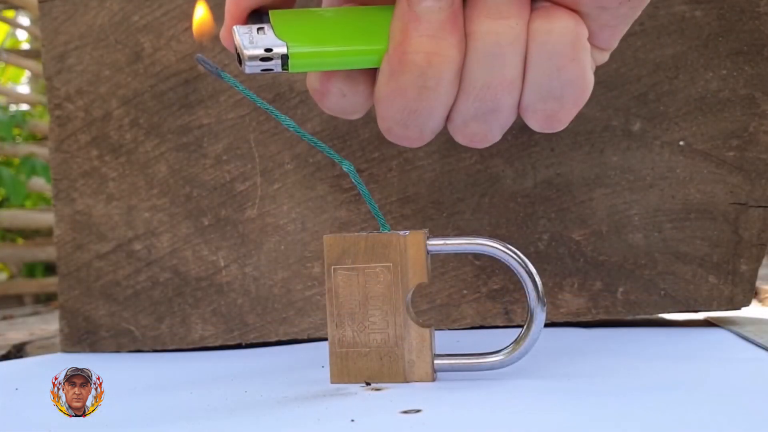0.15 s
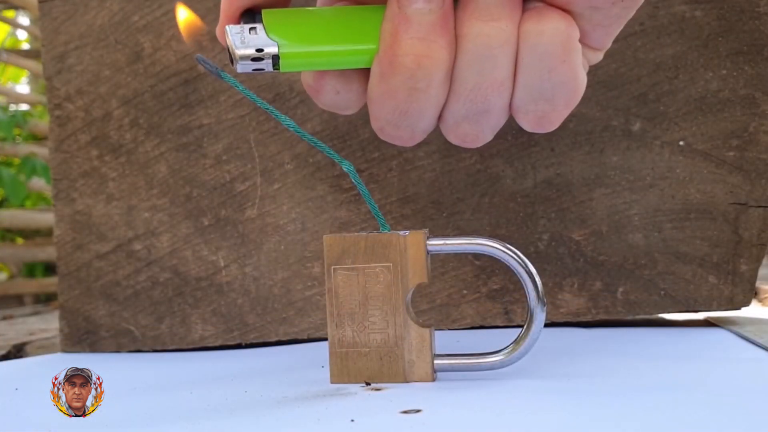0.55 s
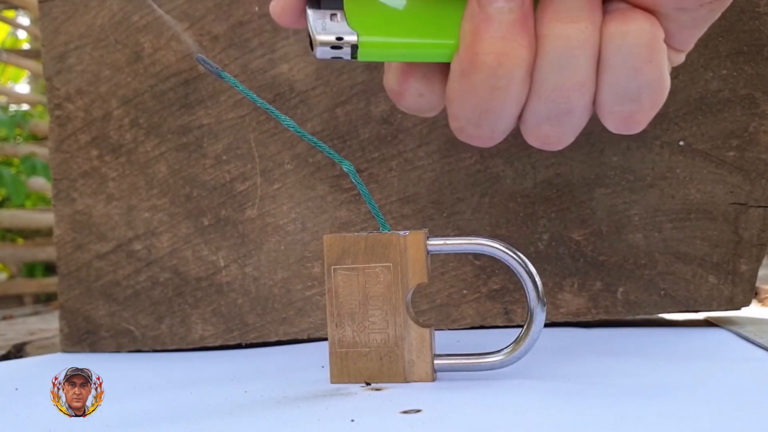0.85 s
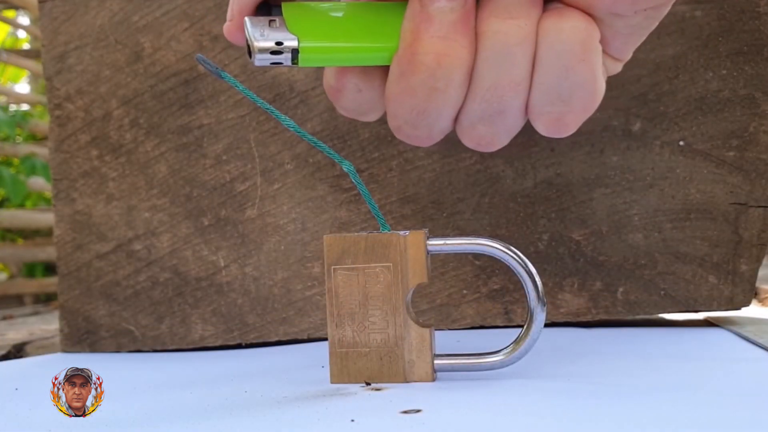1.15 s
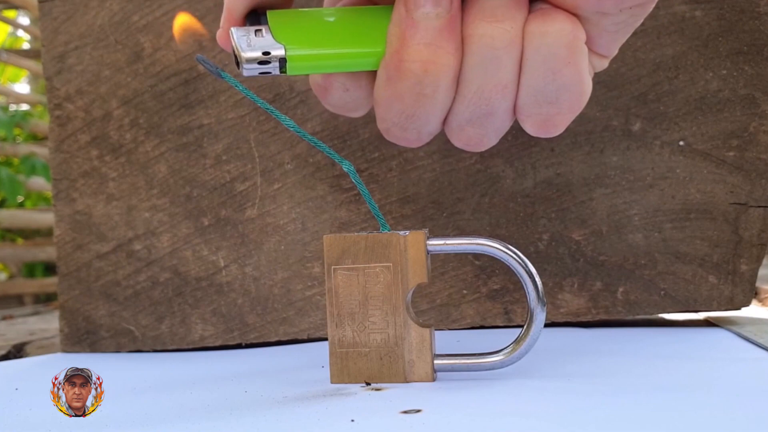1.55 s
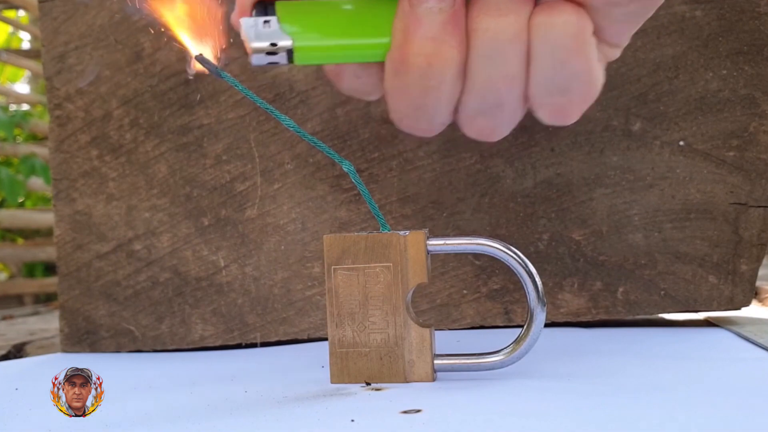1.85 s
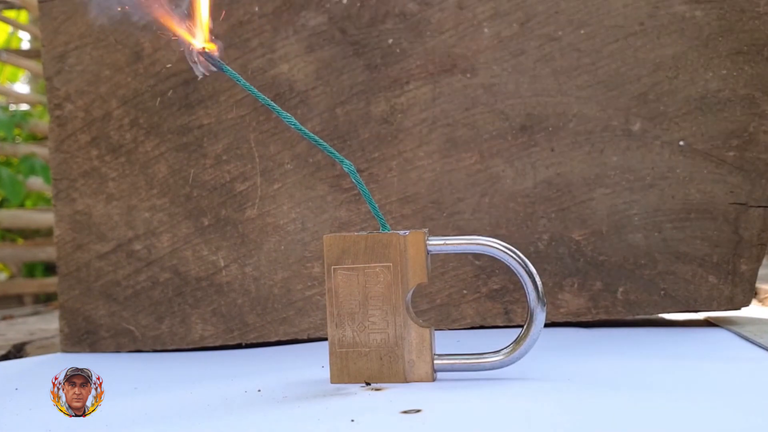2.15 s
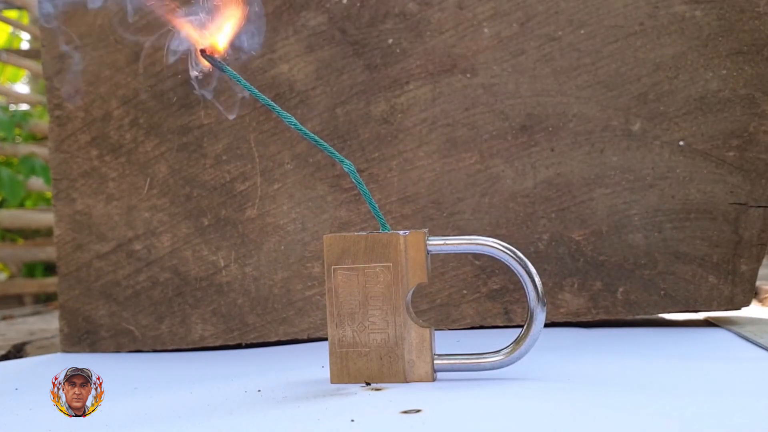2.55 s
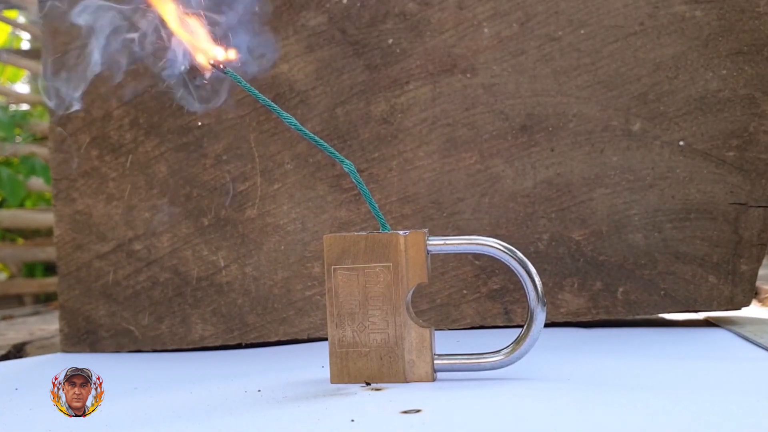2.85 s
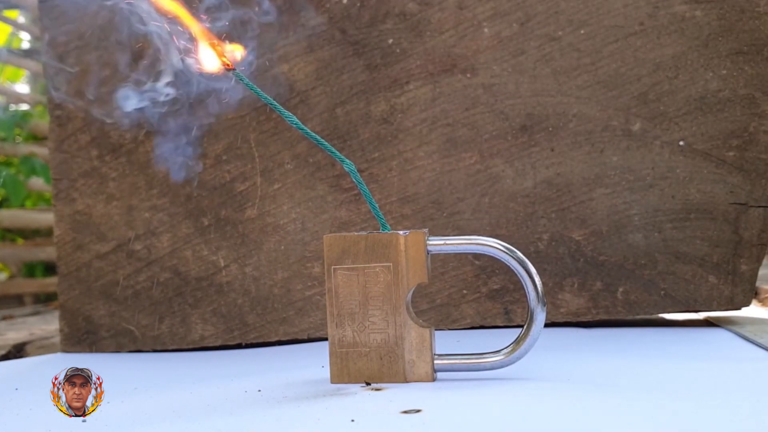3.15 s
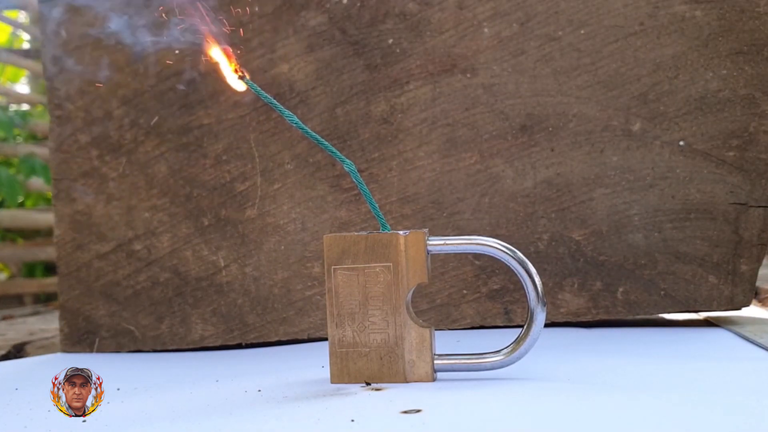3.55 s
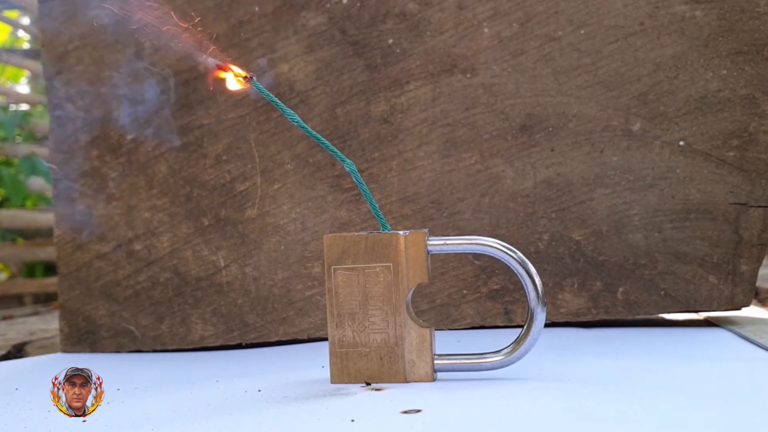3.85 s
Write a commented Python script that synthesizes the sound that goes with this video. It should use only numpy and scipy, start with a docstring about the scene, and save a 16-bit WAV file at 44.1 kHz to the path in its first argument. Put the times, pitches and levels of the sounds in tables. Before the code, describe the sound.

A burning fuse hisses and crackles, catching after two sharp lighter snaps and just before a third. It spits and pops most near the end, heard up close in a dry room with a faint, distant motor hum.

```python
"""A fairly dead room, a motor droning far away; close to the microphone, in front of a wooden board,
a piezo lighter snaps off, is struck again and lights a thin fuse. The lighter snaps off once more.
The fuse burns on with a bright hiss of gas over a fluttering flame and the fine crackle of powder grains,
with a few pops and spells of spitting, thickest near the end. The room adds a short tail."""
import sys
import numpy as np
from scipy import signal
from scipy.fft import rfft, irfft
from scipy.io import wavfile
from scipy.ndimage import uniform_filter1d

SR = 44100
rng = np.random.default_rng(int(sys.argv[2]) if len(sys.argv) > 2 else 0)


def digitize_waveform(pressure):
    """Quantize a signal to 16-bit integers and store it at the path in sys.argv[1].

    Rows of a 2-D input are taken as channels; values are limited to [-1, 1].
    """
    field = np.atleast_2d(pressure).T
    bounded = np.clip(field, -1, 1)
    quanta = np.round(bounded * 32767).astype(np.int16)
    wavfile.write(sys.argv[1], SR, quanta)


N = 176400

# resonances of the lighter's plastic case: pitch_hz, width_hz, level_db
PLASTIC_CASE_MODES = [(2312, 624, 2.5), (3930, 430, -7), (5660, 1000, -4.5)]
# resonances of its metal cap: pitch_hz, width_hz, level_db
METAL_CAP_MODES = [(3960, 1730, -11), (5320, 2000, -6.5), (6650, 2100, 0), (9250, 550, -3),
                   (10470, 4700, 2), (12200, 1300, -13), (14100, 1880, -8)]
CLICK_DECAY_S = .0007


def undb(db):
    """Decibels to gain."""
    return 10 ** (np.asarray(db) / 20)


def unit(x):
    """Scale to rms 1."""
    return x / np.sqrt(np.mean(x ** 2))


def clock():
    """Time of every sample in seconds."""
    return np.arange(N) / SR


def over_time(points):
    """Join (time_s, value) points into one value per sample."""
    return np.interp(clock(), *np.array(points).T)


def swell(start, length):
    """A smooth rise and fall."""
    return np.sin(np.pi * np.clip((clock() - start) / length, 0, 1))


def per_bin(points):
    """Join (frequency_hz, value) points on a log-frequency axis, one value per FFT bin."""
    hz, value = np.array(points, float).T
    return np.interp(np.log(np.arange(N // 2 + 1) * SR / N + 1), np.log(hz), value)


def colour(x, points):
    """Filter by a spectrum that falls away outside its ends, then scale to rms 1."""
    skirted = [(points[0][0] / 2, -80)] + list(points) + [(points[-1][0] * 2, -80)]
    return unit(irfft(rfft(x) * undb(per_bin(skirted)), N))


def pan(db):
    """Left and right gains for a level difference, left minus right."""
    return undb(np.array([[.5], [-.5]]) * db)


def stereo_noise(correlation):
    """Left and right noise with the given correlation, overall or per bin."""
    mid, side = rfft(rng.standard_normal((2, N)))
    alike = np.clip(correlation, -1, 1)
    return unit(irfft(mid * np.sqrt(1 + alike) + np.array([[1], [-1]]) * side * np.sqrt(1 - alike), N))


def wander(rate_hz):
    """Random drift with rms 1, mostly slower than rate_hz."""
    hz = np.arange(N // 2 + 1) * SR / N
    return unit(irfft(rfft(rng.standard_normal(N)) / (1 + (hz / rate_hz) ** 2), N))


def grains(per_s, spread_db):
    """Tiny bursts at random moments, most weak and a few strong."""
    bursts = rng.random(N) < per_s / SR
    return unit(bursts * undb(spread_db * np.minimum(rng.exponential(size=N), 5)))


def ring(x, modes):
    """Pass a push through damped modes with steep skirts."""
    out = 0
    for hz, width, db in modes:
        b, a = signal.iirpeak(hz, hz / width, fs=SR)
        out = out + undb(db) * signal.lfilter(b, a, signal.lfilter(b, a, x))
    return out


def tail(x, decay_s):
    """Diffuse reflections that die away, different on the left and right."""
    t = clock()[:SR // 2]
    echo = rng.standard_normal((2, len(t))) * np.exp(-t / decay_s)
    return signal.fftconvolve(x, echo / np.sqrt(np.sum(echo ** 2) / 2), axes=1)[:, :N]


def reverb(x, t60_s):
    """A room tail that falls 60 dB in t60_s."""
    return tail(x, t60_s / np.log(1000))


def distant_motor():
    """A far motor hums over low rumble; its tones waver with its speed and each flickers in level."""
    # tones of the motor: pitch_hz, level_db
    tones = [(80.5, -55.5), (101, -58.5), (126, -56.5), (151.5, -73), (202, -67.5), (227, -76), (252, -75)]
    # spectrum of the rumble: frequency_hz, relative_db
    rumble_colour = [(22, -25), (31, -23), (39, 3), (60, 6.5), (80, 5), (140, 5.5), (180, -8.5),
                     (280, -10.5), (450, -19.5), (800, -26), (1500, -39.5), (4000, -46.5)]
    # slow rise and fall of hum and rumble: time_s, gain_db
    drone_gain = [(0, -5.5), (.3, -3), (1.05, 0), (1.55, 3.5), (2.05, 1.5), (2.6, 0), (3.1, 0.5), (4, 0)]
    waver, flicker_db = .0077, 3
    speed = 1 + waver * wander(rate_hz=2.51)
    hum = 0
    for hz, db in tones:
        amplitude = np.sqrt(2) * undb(db + flicker_db * wander(rate_hz=15))
        hum += amplitude * np.sin(2 * np.pi * (hz * np.cumsum(speed) / SR + rng.random()))
    correlation = per_bin([(100, .9), (400, .78), (1500, .1)])
    rumble = undb(-51.5) * colour(stereo_noise(correlation), rumble_colour)
    return (hum + rumble) * undb(over_time(drone_gain)) * pan(2.5)


def room_air():
    """Faint, wide air noise that swells over the first second or so."""
    # spectrum of the air: frequency_hz, relative_db
    air_colour = [(500, 19.5), (1700, 11.5), (3300, 6), (6000, 6), (7700, -3), (9400, 10), (11200, 7.5),
                  (12200, 1), (14000, 2), (15600, -3)]
    # its rise: time_s, gain_db
    air_gain = [(0, 1), (.92, 5.5), (1.1, 9.5)]
    return undb(-82 + over_time(air_gain)) * colour(stereo_noise(.1), air_colour) * pan(3)


def handling():
    """The trigger ticks under the thumb and rings case and cap; fingers rub and the nozzle puffs gas."""
    # ticks of the trigger: start_s, level_db
    ticks = [(0.556, -56), (1.045, -57.5), (1.06, -49), (1.081, -50.5), (1.0937, -58)]
    # rubs and puffs: start_s, length_s, level_db, centre_hz, width_hz
    rustles = [(.71, .04, -77, 2200, 1400), (.94, .07, -77, 2400, 1200), (1.04, .075, -76, 2600, 1400),
               (1.245, .13, -73, 4000, 1100), (1.47, .16, -77, 1750, 300)]
    out, t = np.zeros((2, N)), clock()
    for start, length, db, hz, width in rustles:
        out += undb(db) * swell(start, length) * unit(ring(stereo_noise(.4), [(hz, width, 0)]))
    touch = sum(undb(db) * (t >= start) * np.exp(-np.minimum(abs(t - start) / CLICK_DECAY_S, 100))
                for start, db in ticks)
    return out + ring(touch * rng.standard_normal((2, N)), PLASTIC_CASE_MODES + METAL_CAP_MODES)


def lighter_snaps():
    """Each snap is a hard blow on the case and a brief chatter that rings the cap; board and room answer."""
    # snaps of the lighter: start_s, level_db, chatter_s, case_db, cap_db, left_minus_right_db
    snaps = [(0.5723, -23, 0.00083, -14.5, 1.5, 3), (1.0242, -46, 0.00049, -20, 3, 0),
             (1.1285, -18.5, 0.00066, -1, 1.5, 3.5), (1.8934, -17.5, 0.0029, -7.5, -1.5, 2.5)]
    # spectrum of the room's answer: frequency_hz, relative_db
    room_colour = [(600, -5.5), (1500, -3.5), (2600, 2.5), (4000, -2.5), (6000, -2), (8000, -8), (10000, 0),
                   (12500, -4.5), (15500, -3.5)]
    rattle_db, rattle_decay_s = -16.5, .004
    board_db, board_delay_s = -26.5, .0024
    direct, room_pushes, t = np.zeros((2, N)), np.zeros((2, N)), clock()[:SR // 20]
    blow = undb(25) * (t == 0)
    knock = ring(blow, [(1129, 660, -20.5)])
    rattle = undb(rattle_db) * np.exp(-t / rattle_decay_s)
    for start, db, chatter_s, case_db, cap_db, pan_db in snaps:
        envelope = np.exp(-np.maximum(t - chatter_s, 0) / CLICK_DECAY_S) + rattle
        chatter = np.sign(rng.standard_normal((2, len(t)))) * envelope
        case = undb(case_db) * ring(blow + undb(-8) * chatter[0], PLASTIC_CASE_MODES)
        cap = undb(cap_db) * ring(chatter, METAL_CAP_MODES)
        i = int(start * SR)
        direct[:, i:i + len(t)] += 2 * undb(db) * pan(pan_db) * (knock + case + cap)
        room_pushes[:, i] += undb(db) * np.sqrt(np.sum(envelope ** 2))
    board_echo = undb(board_db) * np.roll(direct, int(board_delay_s * SR), axis=1)
    room = undb(-21) * np.std(direct) * colour(reverb(room_pushes, t60_s=.34), room_colour)
    return direct + board_echo + room


def shimmer(x, depth_db=2, span_hz=400, span_s=.09):
    """Let neighbouring bands swell and sink on their own, as a restless jet does."""
    size = 512
    bands = signal.stft(x, nperseg=size)[2]
    drift = rng.standard_normal(bands.shape[1:])
    drift = uniform_filter1d(drift, round(span_hz * size / SR), axis=0)
    drift = uniform_filter1d(drift, round(span_s * SR * 2 / size), axis=1)
    return unit(signal.istft(bands * undb(depth_db * unit(drift)), nperseg=size)[1][:, :N])


def burning_fuse():
    """Gas and bursting powder grains hiss above a fluttering flame, all following the uneven burn."""
    # course of the burn: time_s, hiss_db, jet_db, flame_db, roar_db
    burn = [(1.7, -72.0, -75.0, -71.5, -64.5), (1.74, -52.5, -56.5, -56.0, -60.5),
            (1.78, -49.5, -52.5, -51.5, -53.5), (1.85, -50.5, -53.5, -50.0, -51.5),
            (1.94, -47.0, -50.5, -51.0, -53.0), (2.0, -45.0, -47.0, -48.0, -53.5),
            (2.07, -46.5, -52.0, -52.5, -54.0), (2.22, -47.0, -52.0, -54.0, -57.0),
            (2.52, -52.0, -52.0, -53.5, -55.5), (2.61, -53.5, -56.5, -58.0, -58.0),
            (2.76, -50.5, -52.0, -49.5, -52.0), (2.96, -48.5, -56.0, -57.5, -59.0),
            (3.13, -48.5, -56.5, -57.5, -56.5), (3.28, -50.0, -56.5, -59.5, -63.0),
            (3.36, -50.0, -57.0, -61.0, -61.5), (3.45, -53.5, -57.5, -59.5, -63.0),
            (3.54, -50.5, -55.5, -58.5, -59.5), (3.62, -48.0, -51.0, -53.5, -58.0),
            (3.7, -52.0, -54.0, -53.5, -57.0), (3.82, -50.5, -52.5, -48.5, -54.5),
            (3.89, -46.5, -47.5, -47.0, -55.5), (3.945, -48, -50, -48.5, -55),
            (4.0, -50.0, -52.5, -55, -58.5)]
    # spectra of the hiss, the gas jet, the flame and its low roar: frequency_hz, relative_db
    hiss_colour = [(6500, -19), (8400, -24), (9250, 0), (9950, -6.5), (10900, -0.5), (11750, -2.5),
                   (12400, -0.5), (13000, -3), (13500, -2), (14700, -3.5), (15400, 0), (16000, -4)]
    jet_colour = [(1800, -41), (2750, -1), (3450, -3.5), (3850, -2.5), (4300, -1), (4900, -11.5),
                  (5450, -2), (6100, -6.5), (6550, -9), (7000, -7.5), (7400, -10.5), (8000, -13),
                  (9500, -10.5)]
    flame_colour = [(600, -11), (900, -11), (1300, -2), (1950, -1.5), (2700, -9.5), (4500, -11.5)]
    roar_colour = [(150, -1), (280, 1.5), (450, 3.5), (620, 0), (900, -12.5), (1400, -5.5)]
    # balance of the fuse at the microphone: frequency_hz, left_minus_right_db
    balance = [(300, 3.5), (800, 1.5), (1300, 9), (2100, -5), (3000, 6.5), (3800, -2.5), (4500, 1.5),
               (5500, 0.5), (7000, -0.5), (9200, 10.5), (10200, 11.5), (11400, -2), (12300, 18),
               (13100, -5), (14300, 6), (15500, 6)]
    # likeness of left and right: frequency_hz, correlation
    likeness = [(150, 0.25), (500, 0.7), (1100, 0.1), (1900, .2), (2600, -0.15), (3700, -.3), (4300, 0.2),
                (5500, .5), (6300, -0.1), (9200, -.2), (11000, 0.45), (12000, -.05), (12600, .2),
                (13400, -0.45), (14300, .25), (15200, .8)]
    ignition_s, catch_s = 1.69, .019
    gas_flutter_db, flame_flutter_db = .67, 1.5
    t, (times, *levels) = clock(), np.array(burn).T
    hiss_db, jet_db, flame_db, roar_db = (np.interp(t, times, level) for level in levels)
    flutter = wander(rate_hz=42)
    sputter = undb(-12) * grains(per_s=79, spread_db=1)  # small pops in the flame
    gas = shimmer(stereo_noise(per_bin(likeness)))
    gas += undb(-22) * grains(per_s=240, spread_db=4.5)  # sparks
    fire = shimmer(stereo_noise(per_bin(likeness)))
    hiss = colour(gas, hiss_colour) * undb(hiss_db - .24 + gas_flutter_db * flutter)
    jet = colour(gas, jet_colour) * undb(jet_db - .23 + gas_flutter_db * flutter)
    flame = colour(fire + sputter, flame_colour) * undb(flame_db + .14 + flame_flutter_db * flutter)
    roar = colour(gas + sputter, roar_colour) * undb(roar_db + .83 + flame_flutter_db * flutter)
    sides = pan(per_bin(balance))
    sides /= np.sqrt(np.mean(sides ** 2, axis=0))  # each band keeps its power
    at_microphone = irfft(rfft(hiss + jet + flame + roar) * sides, N)
    surge = undb(.8 * wander(rate_hz=12))
    alight = np.clip((t - ignition_s) / catch_s, 0, 1)
    return at_microphone * surge * alight


def powder_pops():
    """Pockets of powder burst with a brief swing of pressure that scatters off the board and table."""
    # bursting pockets: start_s, level_db, pitch_hz, decay_s
    pockets = [(2.150, -33.5, 690, 0.00031), (2.7115, -27.5, 1910, 0.0002), (2.7535, -41, 497, 0.00073),
               (2.7552, -43, 1800, 0.00033), (2.782, -40, 443, 0.00052), (3.727, -38, 1120, 0.0023),
               (3.734, -32, 950, 0.00042), (3.749, -34, 2680, 0.00044), (3.769, -17.5, 2130, 0.00035),
               (3.781, -41, 1710, 0.00059), (3.7853, -33, 2200, 0.00033), (3.806, -25, 1020, 0.00039),
               (3.807, -31, 1170, 0.0018), (3.8317, -40, 1170, 0.0011)]
    out = np.zeros((2, N))
    for start, db, hz, decay in pockets:
        age = np.maximum(clock() - start, 0)
        rise = 2 * age / decay
        envelope = rise * np.exp(1 - np.minimum(rise, 100))
        out += undb(db) * envelope * np.sin(2 * np.pi * hz * age)
    return out + undb(-6) * tail(out, decay_s=.003)


def spitting():
    """Spells of dense, rough crackle where the powder burns unevenly."""
    # spells of spitting: start_s, length_s, level_db
    spells = [(2.69, 0.11, -57.5), (3.774, 0.019, -38), (3.71, 0.14, -47.5)]
    # spectrum of the crackle: frequency_hz, relative_db
    crackle_colour = [(400, -13), (1100, 6), (2000, 2), (3300, 10), (4500, -27)]
    bursts = np.tile(grains(per_s=526, spread_db=6.5), (2, 1))
    crackle = colour(tail(bursts, decay_s=.0028), crackle_colour)
    return crackle * sum(undb(db) * swell(start, length) for start, length, db in spells)


def scene():
    """Lighter and fuse close to the microphone in a fairly dead room, the motor far behind."""
    near = lighter_snaps() + handling() + burning_fuse() + spitting() + powder_pops()
    early = undb(-10) * reverb(near, t60_s=.055)
    late = undb(-38.5) * reverb(near, t60_s=.18)
    return near + early + late + distant_motor() + room_air()


def record(dry):
    """The recorder rounds the loudest snaps and cuts the top."""
    ceiling, top_hz = .4, 15750
    rounded = ceiling * np.tanh(dry / ceiling)
    return signal.sosfilt(signal.ellip(10, .2, 70, top_hz, fs=SR, output="sos"), rounded)


dry = scene()
out = record(dry)
digitize_waveform(out)
```